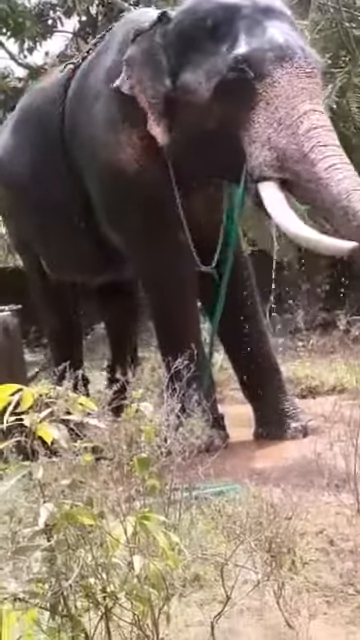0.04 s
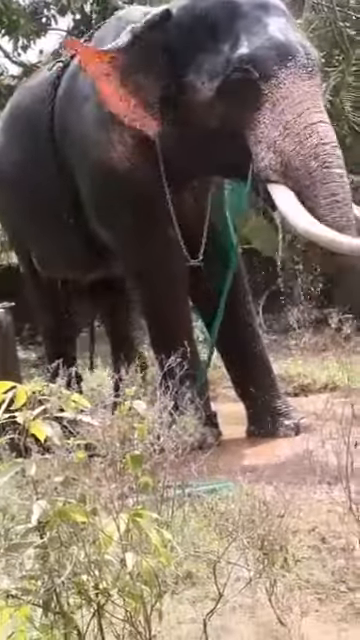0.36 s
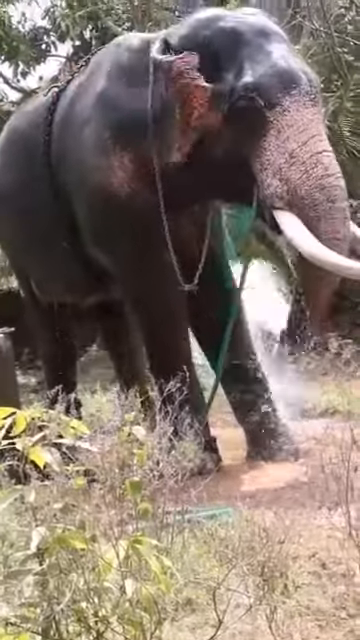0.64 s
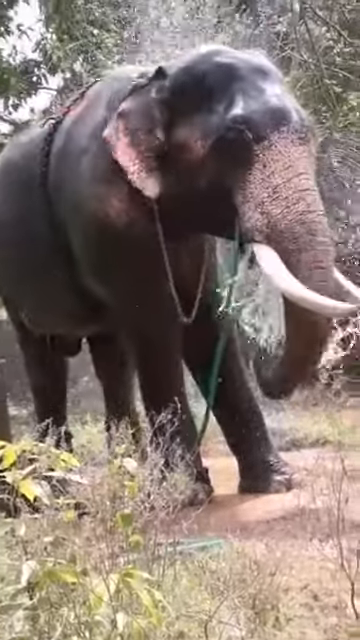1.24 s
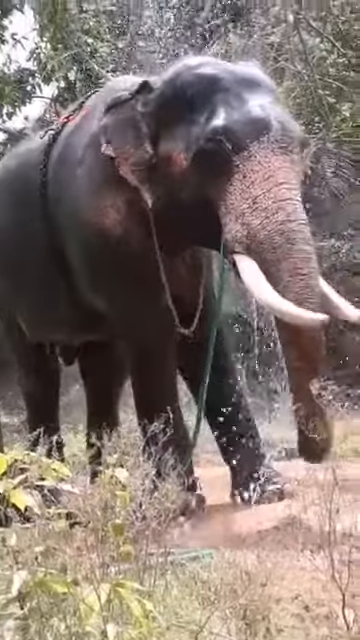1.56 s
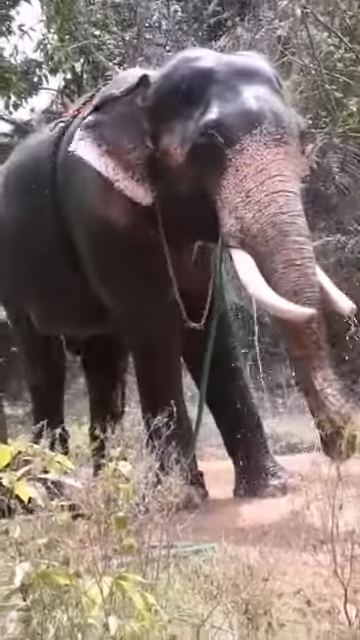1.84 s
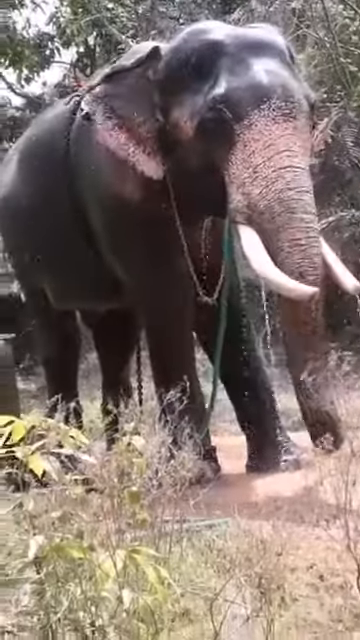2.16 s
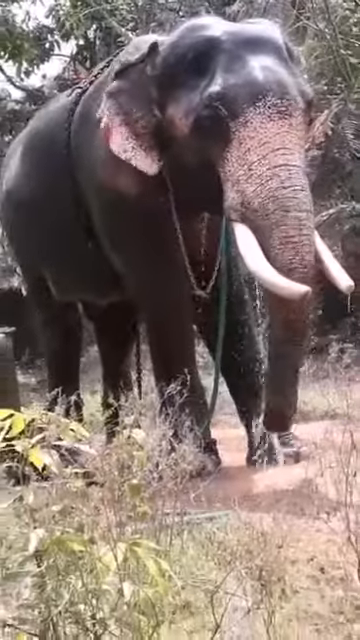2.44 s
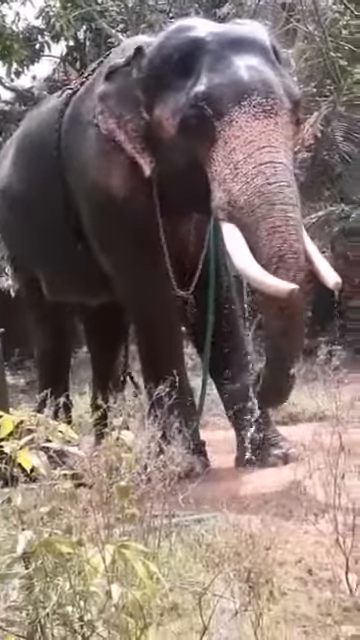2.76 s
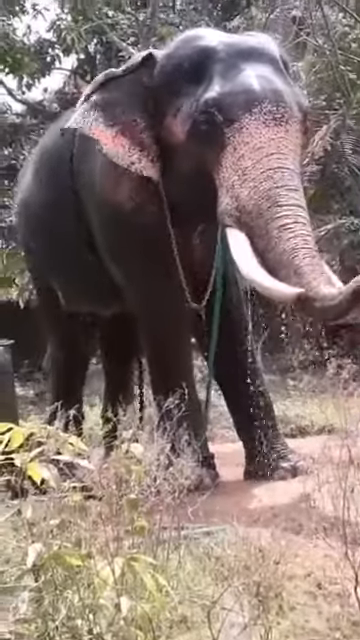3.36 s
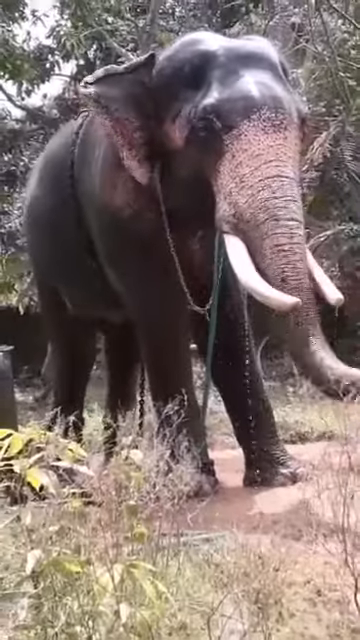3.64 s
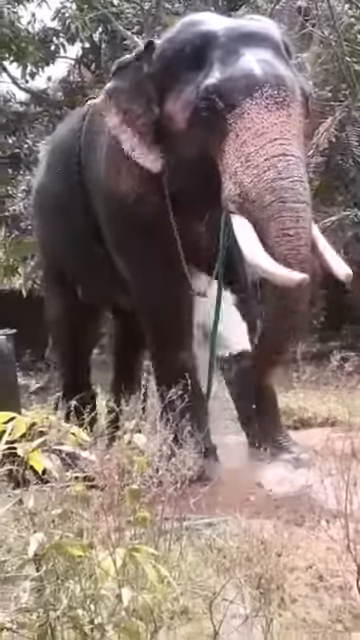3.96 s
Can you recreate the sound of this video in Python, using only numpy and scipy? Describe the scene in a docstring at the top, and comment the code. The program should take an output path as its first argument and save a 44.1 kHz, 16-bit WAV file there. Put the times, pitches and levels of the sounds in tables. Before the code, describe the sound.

Water patters and drips on wet ground in a yard as an elephant showers itself. A gurgle and a short hissing spray are followed by splashing and dripping run-off, then the trunk gurgles, hoots faintly and starts spraying again.

```python
"""Spray patters on hide and wet ground, with drips, splats and soft thuds: an elephant hosing itself down.
Air gurgles through the water in its trunk, then both leave the tip in a hissing blast. The thrown load
lands a second later and the run-off drips, ringing small bubbles in the puddles. The trunk gurgles
again, hoots briefly, and the next blast begins. The yard adds a short echo and a low background."""
import sys
import numpy as np
from scipy import signal
from scipy.fft import rfft, irfft
from scipy.io import wavfile
from scipy.ndimage import uniform_filter1d

SR = 44100
rng = np.random.default_rng(int(sys.argv[2]) if len(sys.argv) > 2 else 0)


def generate_wav(sig):
    """Save sig (samples, or channels by samples) to the path in sys.argv[1] as 16-bit PCM at SR."""
    pcm = np.round(np.clip(np.atleast_2d(sig).T, -1, 1) * 32767).astype(np.int16)
    wavfile.write(sys.argv[1], SR, pcm)


N = 176400
T = np.arange(N) / SR
HZ = np.fft.rfftfreq(8192, 1 / SR)


def amp(db):
    """Decibels to gain."""
    return 10 ** (np.asarray(db) / 20)


def unit(x):
    """Scale to rms 1."""
    return x / np.sqrt(np.mean(x ** 2) + 1e-20)


def curve(points):
    """Interpolate (t/s, level/dB) points onto T."""
    return np.interp(T, *np.transpose(points))


def spectrum(points):
    """Interpolate (f/Hz, level/dB) points onto HZ, over log frequency."""
    hz, db = np.transpose(points)
    return np.interp(np.log(HZ + 1), np.log(hz), db)


def hump(hz, octaves):
    """Broad resonance on HZ, in dB."""
    return -40 * np.log10(1 + (np.log2((HZ + 1) / hz) / octaves) ** 2 / 2)


def colour(x, shape_db):
    """Minimum-phase filter of unit energy."""
    cepstrum = np.fft.irfft(np.log(amp(np.maximum(shape_db - shape_db.max(), -90))))
    cepstrum[1:4096] *= 2
    cepstrum[4097:] = 0
    taps = irfft(np.exp(rfft(cepstrum)))[:2048]
    return signal.fftconvolve(x, taps / np.linalg.norm(taps))[:len(x)]


def add(mix, start_s, sound):
    """Mix a sound in at start_s."""
    part = mix[max(round(start_s * SR), 0):][:len(sound)]
    part += sound[:len(part)]


def wander(scale_s, size=N):
    """Smooth random drift, rms about 1."""
    lowpass = np.exp(-(np.fft.rfftfreq(N, 1 / SR) * scale_s) ** 2)
    return unit(irfft(rfft(rng.standard_normal(N)) * lowpass, N))[:size]


def impacts(per_s, size, spread_db=4.0):
    """Random impulses, mostly small with a few large; rms 1."""
    strength = amp(spread_db * np.minimum(rng.exponential(1, size), 3.5))
    return unit(strength * rng.choice([-1, 1], size) * (rng.random(size) < per_s / SR))


def bubble(hz, decay_cycles, rise_per_s=2.74):
    """An air pocket rings, rising in pitch as it nears the surface."""
    t = T[:2000]
    return np.sin(2 * np.pi * hz * t * (1 + rise_per_s * t)) * np.exp(-hz * t / decay_cycles)


def puddle_bubbles(count, low_hz, high_hz, spread_db, decay_cycles, skew=1):
    """Bubbles ring at random times, rms 1; skew above 1 favours low pitches."""
    bubbles = np.zeros(N)
    for when, pitch, size in rng.random((count, 3)):
        hz = low_hz * (high_hz / low_hz) ** pitch ** skew
        add(bubbles, when * N / SR, amp(spread_db * size) * bubble(hz, decay_cycles))
    return unit(bubbles)


# Falling water: t/s, level/dB
FALL_LEVEL = [(0, -31), (.11, -38), (.45, -40), (.58, -40.5), (.64, -35), (.70, -38.5), (.84, -37),
              (.92, -34), (1.0, -33.5), (1.08, -40), (1.28, -39), (1.38, -44.5), (1.55, -44), (1.60, -48.5),
              (1.66, -39), (1.73, -29), (1.85, -29), (1.90, -34.5), (2.2, -36.5), (2.5, -36), (2.66, -41.5),
              (3.17, -43), (3.27, -38.5), (3.40, -40.5), (3.49, -41), (3.59, -35.5), (3.67, -40.5),
              (3.78, -39.5), (3.81, -40.5), (4, -41)]
# Water striking wet ground: f/Hz, level/dB
WET_SPECTRUM = [(100, -45.5), (250, -13.5), (500, -22), (850, -21), (1200, -11), (1550, -11.5), (2050, 0),
                (2450, -3), (2900, -6), (3700, -0.5), (4700, -4), (5700, 1.5), (6600, 1.5), (7600, -3.5),
                (8400, 2), (8800, 4.5), (9600, -2.5), (10700, 0), (11600, -5.5), (13500, -7.5),
                (15500, -20.5)]
# Heavy drops relative to fine ones: t/s, level/dB
HEAVY_BALANCE = [(0, -0.5), (.6, 3.5), (.95, 3.5), (1.3, 9), (1.6, -3), (1.75, 1), (2.1, -8.5), (2.35, 3),
                 (2.8, -10), (3.1, 1.5), (3.6, -5.5), (4, 9.5)]


def patter(mist_share=0.6, split_hz=1950, plip_db=-15.5):
    """Heavy and fine drops land in clumps over a mist; some ring small bubbles in the puddles."""
    drops = np.sqrt(1 - mist_share) * impacts(3000, N)
    mist = np.sqrt(mist_share) * rng.standard_normal(N)
    clumps = amp(1.3 * wander(0.008))
    spray = unit(colour((drops + mist) * clumps, spectrum(WET_SPECTRUM)))
    heavy = signal.sosfiltfilt(signal.butter(2, split_hz, fs=SR, output="sos"), spray)
    fine = spray - heavy
    heavy_gain = amp(curve(HEAVY_BALANCE) + 2.5 * wander(0.036))
    plips = puddle_bubbles(400, low_hz=1933, high_hz=6920, spread_db=16, decay_cycles=13, skew=2)
    return amp(curve(FALL_LEVEL)) * (fine + heavy_gain * heavy + amp(plip_db) * plips)


def slosh(relative_db=-27):
    """Larger air pockets glug in the puddles while water falls."""
    glugs = puddle_bubbles(150, low_hz=381.4, high_hz=1464, spread_db=14, decay_cycles=10.7)
    return amp(curve(FALL_LEVEL) + relative_db) * glugs


# Water drumming: t/s, level/dB
DRUM_LEVEL = [(0, -74), (.45, -65), (.55, -54), (.70, -58.5), (.725, -45), (.78, -60.5), (1.0, -68),
              (1.25, -56.5), (1.42, -64), (1.55, -58.5), (1.66, -55), (1.72, -66), (1.85, -54), (1.98, -63),
              (2.25, -64), (3.1, -61), (3.5, -62.5), (3.9, -59.5), (4, -46)]


def drumming():
    """Falling water drums dully and unevenly on hide and mud."""
    hits = unit(impacts(500, N) + rng.standard_normal(N))
    level_db = curve(DRUM_LEVEL) + 0.5 * wander(0.045)
    return amp(level_db) * colour(hits, hump(hz=262, octaves=1))


# Outdoor background: f/Hz, level/dB
AIR_SPECTRUM = [(20, 1), (60, -7.5), (90, -3), (140, 3.5), (220, 5.5), (340, -9.5), (520, -8), (700, 3),
                (900, -25.5), (1200, 3.5), (2000, -40), (5000, -15), (16000, -44)]


def air(level_db=-60):
    """Low, steady outdoor noise."""
    return amp(level_db) * colour(rng.standard_normal(N), spectrum(AIR_SPECTRUM))


# Big drops hitting puddles: t/s, peak level/dB, f/Hz
PUDDLE_DRIPS = [(.054, -27, 2380), (0.125, -31, 2280), (0.1982, -23.5, 2350), (0.1997, -21, 4400),
                (0.3986, -21, 3390), (0.627, -29, 2380), (.637, -29, 2200), (.665, -31, 2100),
                (1.008, -24.5, 2270), (1.127, -27, 2100), (1.382, -34.5, 2100), (1.687, -16.5, 6270),
                (1.690, -23.5, 2180), (1.692, -22, 5850), (1.699, -24, 2220), (1.707, -25, 2210),
                (1.727, -24, 2080), (1.758, -22, 2340), (1.8054, -22, 2140), (1.851, -24.5, 2030),
                (1.914, -32, 2080), (1.926, -30, 2170), (1.962, -34, 2290), (2.0497, -29, 2520),
                (2.058, -32, 2160), (2.0845, -28, 2310), (2.166, -36, 2220), (2.1906, -34, 2570),
                (2.203, -28, 2340), (2.237, -35, 2660), (2.255, -26, 2680), (2.268, -30, 2520),
                (2.297, -21.5, 2290), (2.336, -30, 1810), (2.381, -26.5, 2170), (2.466, -26.5, 2140),
                (2.492, -35, 3100), (2.611, -28, 2140), (2.736, -30.5, 2330), (2.7703, -30, 2610),
                (3.0837, -37.5, 2260), (3.128, -47, 2200), (3.181, -38, 2040), (3.441, -32.5, 2240),
                (3.5082, -20, 6100), (3.571, -26.5, 2380), (3.8295, -26, 4440), (3.833, -17.5, 4730),
                (3.928, -21, 9100)]


def drip(peak_db, hz, spray_db=-10, spray_decay_s=0.0013, ring_db=-15.5):
    """A drop smacks, throws fine spray and traps air that rings briefly."""
    t = T[:SR // 10]
    hit = amp(spray_db) * rng.standard_normal(len(t)) * np.exp(-t / spray_decay_s)
    hit[0] = 1
    smack = colour(hit, spectrum(WET_SPECTRUM) + hump(hz, octaves=0.45))
    add(smack, 0, amp(ring_db) * abs(smack).max() * bubble(hz, decay_cycles=27))
    return amp(peak_db) * smack / abs(smack).max()


# Dull thuds: t/s, peak level/dB, f/Hz, length/s
LOW_THUDS = [(.080, -57, 71, .012), (.190, -54, 85, 0.011), (0.279, -47.5, 121, 0.013),
             (.712, -54, 210, 0.013), (1.091, -46.5, 227, 0.014), (1.71, -53, 175, 0.014),
             (1.76, -50.5, 243.4, 0.037), (1.785, -74, 110, 0.023), (2.801, -52, 215.7, 0.11)]


def thud(peak_db, hz, length_s):
    """A soft, low tone swells for half of length_s, then fades."""
    t = T[:SR // 2]
    age = 2 * t / length_s
    return amp(peak_db) * age * np.exp(1 - age) * np.sin(2 * np.pi * hz * t)


# Lumps of water landing: t/s, level/dB, decay/s, centre f/Hz, width/octaves
WATER_SPLATS = [(0.201, -32, 0.014, 4300, 0.45), (0.286, -31.5, 0.011, 8500, 2.4),
                (0.327, -35.5, 0.018, 4930, 0.35), (.365, -42, 0.012, 5960, 0.88),
                (0.398, -38.5, 0.01, 3360, 0.2), (0.47, -32, 0.0063, 6700, 0.71),
                (0.524, -32.5, 0.007, 4500, 0.64), (0.623, -33, 0.0083, 3420, 0.39),
                (0.643, -36, 0.0077, 5500, 1.2), (.801, -31, 0.0067, 6030, 1.4),
                (1.087, -33.5, 0.022, 3260, 1.5), (1.412, -36.5, 0.0072, 7500, 0.76),
                (1.476, -43, 0.0066, 7000, 1.7), (1.664, -31.5, 0.016, 5960, 2.7),
                (1.687, -23, 0.0077, 5570, 1.2), (2.085, -30, 0.0087, 4300, 1.4),
                (2.165, -36, 0.0099, 4030, 1.1), (2.298, -35, 0.0091, 2800, 0.99),
                (2.383, -39, 0.005, 2500, 0.69), (2.605, -33.5, 0.005, 5100, 2.4),
                (2.672, -36.5, 0.0098, 6000, 1.5), (2.767, -36.5, 0.012, 4260, 1.4),
                (2.816, -38, 0.013, 6000, 5.2), (2.907, -34.5, 0.012, 6850, 0.62),
                (3.012, -35.5, 0.0078, 6090, 1.6), (3.060, -33.5, 0.0034, 5060, 2.6),
                (3.507, -30, 0.0096, 5400, 1.5), (3.549, -30.5, 0.0066, 6000, 0.28),
                (3.688, -38.5, 0.015, 5540, 1.9), (3.738, -32.5, 0.0077, 6070, 2),
                (3.851, -36, 0.0046, 5830, 1.6), (3.882, -38, 0.0048, 5100, 0.23)]


def splat(level_db, decay_s, hz, octaves):
    """A lump of water breaks into a dying burst of droplets; bigger lumps take longer to land."""
    t = T[:SR // 4]
    droplets = unit(impacts(2000, len(t)) + rng.standard_normal(len(t)))
    rise_s = 0.82 * decay_s
    envelope = np.minimum(t / rise_s, np.exp(-(t - rise_s) / decay_s))
    burst = droplets * envelope
    burst *= np.linalg.norm(envelope) / np.linalg.norm(burst)
    return amp(level_db) * colour(burst, spectrum(WET_SPECTRUM) + hump(hz, octaves))


# Wet trunk resonances: f/Hz, bandwidth/Hz, level/dB
TRUNK_RESONANCES = [(2140, 100, 2.5), (2570, 55, -6), (3300, 140, -8)]


def trunk_ring(x):
    """The trunk's narrow resonances bend together as water moves inside."""
    bend = 1 + 0.015 * wander(0.022, len(x))
    ring = np.zeros(len(x))
    for hz, width_hz, db in TRUNK_RESONANCES:
        carrier = np.exp(2j * np.pi * np.cumsum(hz * bend) / SR)
        pole = np.exp(-np.pi * width_hz / SR)
        ring += amp(db) * (carrier * signal.lfilter([1 - pole], [1, -pole], x / carrier)).real
    return unit(ring)


# Water in the trunk: t/s, length/s, level/dB, centre f/Hz, relative body/dB, relative ring/dB
TRUNK_GURGLES = [(0.509, 0.023, -34, 1830, -13.5, -2), (0.532, 0.039, -37, 1720, -16, -1),
                 (0.861, 0.047, -49.5, 330, -22, 2), (0.982, 0.03, -44, 1220, -33, -10),
                 (1.079, 0.11, -47.5, 930, -8, -14), (3.183, 0.1, -50, 2070, -1, 4.5),
                 (3.233, 0.34, -51, 530, -16, -2), (3.246, 0.084, -45.5, 1770, -8, -13),
                 (3.331, 0.14, -52, 920, -2.5, 5.5), (3.823, .025, -45, 1300, -24, -13),
                 (3.947, 0.17, -42, 1130, -8, 1.5)]


def gurgle(length_s, level_db, hz, body_db, ring_db, rise_s=0.0032, bubbles_per_s=100, bubble_db=-19.5):
    """Air pops and bubbles through water, ringing the trunk over its low body."""
    t = T[:SR // 2]
    envelope = np.minimum(t / rise_s, 1) * np.exp(-2 * (t / length_s) ** 2)
    sputter = amp(2 * wander(0.023, len(t)))
    pops = envelope * sputter * unit(impacts(570, len(t)) + rng.standard_normal(len(t)))
    bubbles = np.zeros(len(t))
    for k, (late, pitch) in enumerate(rng.random((40, 2))):
        start_s = (k + late) / bubbles_per_s
        bubble_hz = hz * 2 ** (0.12 * (2 * pitch - 1))
        add(bubbles, start_s, np.interp(start_s, t, envelope) * bubble(bubble_hz, decay_cycles=8.1))
    wet = unit(colour(pops, hump(hz, octaves=0.62))) + amp(bubble_db) * unit(bubbles)
    body = amp(body_db) * unit(colour(pops, hump(hz=230, octaves=0.88)))
    ring = amp(ring_db) * trunk_ring(pops)
    return amp(level_db) * np.sqrt(np.mean(envelope ** 2)) * (wet + body + ring)


# Jet at the trunk tip: f/Hz, level/dB
JET_SPECTRUM = [(47, -83), (80, -18), (197, -6), (374, -9.5), (757, -11.5), (986, -34), (1100, -3),
                (1370, -65), (1500, -15), (2230, 2.5), (2720, -6.5), (6420, 0), (7490, -4), (8930, 1),
                (15500, -11)]
# Blasts: t/s, level/dB, rise/s, decay/s, relative throaty resonance/dB
TRUNK_BLASTS = [(0.7105, -23, 0.006, 0.037, -8.5), (3.973, -29, 0.0077, 0.046, -1)]


def blast(level_db, rise_s, decay_s, throat_db, tail_db=-14, tail_decay_s=0.1):
    """Air and water burst from the trunk tip, then trail off as a hiss."""
    t = T[:SR // 2]
    jet = colour(rng.standard_normal(len(t)), spectrum(JET_SPECTRUM))
    throat = amp(throat_db) * colour(rng.standard_normal(len(t)), hump(hz=2130, octaves=0.43))
    attack = np.minimum(t / rise_s, 1)
    after_s = np.maximum(t - rise_s, 0)
    sputter = amp(0.5 * wander(0.023, len(t)))
    push = np.exp(-after_s / decay_s) * sputter
    tail = amp(tail_db) * np.exp(-after_s / tail_decay_s)
    return amp(level_db) * attack * (push * (jet + throat) + tail * jet)


# Large bubbles bursting: t/s, peak level/dB, f/Hz
BUBBLE_PLOPS = [(.984, -35, 1130), (1.531, -45.5, 1180), (3.839, -36, 1243)]


def plop(peak_db, hz):
    """One large bubble rings alone."""
    return amp(peak_db) * bubble(hz, decay_cycles=8.3)


def hoot(length_s=0.047, level_db=-41, start_hz=621, sag_hz_per_s=730, overtone_db=-3):
    """The wet trunk sounds a hollow, sagging note, roughened by the water in it."""
    t = np.arange(0, length_s, 1 / SR)
    hz = start_hz - sag_hz_per_s * t + 22 * wander(0.0018, len(t))
    phase = 2 * np.pi * np.cumsum(hz) / SR
    swell = np.sin(np.pi * t / length_s)
    rough_gain = amp(level_db + 0.5 * wander(0.0058, len(t)))
    overtone = amp(overtone_db) * swell ** 2 * np.sin(2 * phase)
    return rough_gain * np.sqrt(2) * swell * (np.sin(phase) + overtone)


def yard(x, echo_db=-7.5, t60_s=0.28):
    """Ground, trees and wall add a short, diffuse echo."""
    bins = signal.stft(x, nperseg=256, noverlap=192)[2]
    kept_per_hop = amp(-60 * 64 / SR / t60_s) ** 2
    power = signal.lfilter([0, 0, 1 - kept_per_hop], [1, -kept_per_hop], abs(bins) ** 2)
    scatter = np.sqrt(power) * np.exp(2j * np.pi * rng.random(bins.T.shape).T)
    return x + amp(echo_db) * 2 * signal.istft(scatter, nperseg=256, noverlap=192)[1][:N]


def uneven(x, patch_hz=220, patch_s=0.06, centre_hz=800, octaves=1.1):
    """The middle register swells and thins in short patches."""
    hz, t, bins = signal.stft(x, SR, nperseg=1024, noverlap=768)
    patches = rng.standard_normal(bins.T.shape).T
    patches = uniform_filter1d(patches, round(patch_hz / hz[1]), axis=0)
    patches = unit(uniform_filter1d(patches, round(patch_s / t[1]), axis=1))
    depth_db = 4.5 * np.exp(-(np.log2((hz + 1) / centre_hz) / octaves) ** 2)
    gain = amp(depth_db[:, None] * np.minimum(patches, 1))
    gain /= np.sqrt(np.mean(gain ** 2, axis=1, keepdims=True))
    return signal.istft(bins * gain, nperseg=1024, noverlap=768)[1][:N]


# Stereo width: f/Hz, level/dB
SIDE_SPECTRUM = [(30, -28), (500, -27.5), (1000, -15), (2000, -52.5), (15000, -66)]


def widen(mid):
    """A faint random-phase side signal gives a nearly mono pair."""
    bins = signal.stft(mid, nperseg=512)[2]
    width = amp(spectrum(SIDE_SPECTRUM)[::16, None])
    scramble = np.exp(2j * np.pi * rng.random(bins.T.shape).T)
    side = signal.istft(bins * width * np.sqrt(2) * scramble, nperseg=512)[1][:N]
    return np.array([mid + side, mid - side])


def scene():
    """Single events and the wash of falling water, in the yard."""
    events = np.zeros(N)
    for source, table in ((drip, PUDDLE_DRIPS), (splat, WATER_SPLATS), (blast, TRUNK_BLASTS),
                          (gurgle, TRUNK_GURGLES), (plop, BUBBLE_PLOPS), (thud, LOW_THUDS)):
        for start_s, *row in table:
            add(events, start_s, source(*row))
    add(events, start_s=3.235, sound=hoot())
    events = yard(events)
    wash = yard(patter() + drumming() + slosh())
    return widen(events + uneven(wash + air()))


def record(dry):
    """Low-pass at 15650 Hz."""
    taps = signal.firwin(511, 15650, window=("kaiser", 9), fs=SR)
    return signal.oaconvolve(dry, taps[None], "same")


dry = scene()
out = record(dry)
generate_wav(out)
```